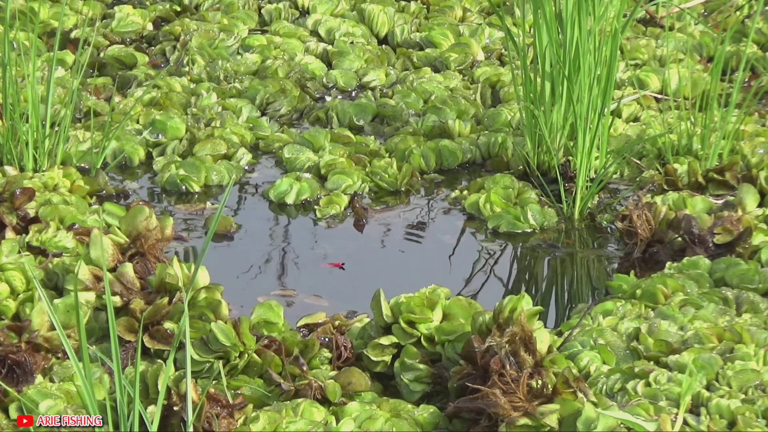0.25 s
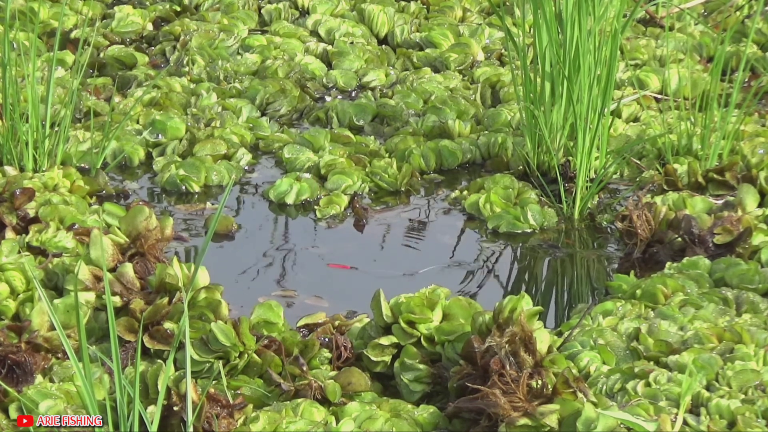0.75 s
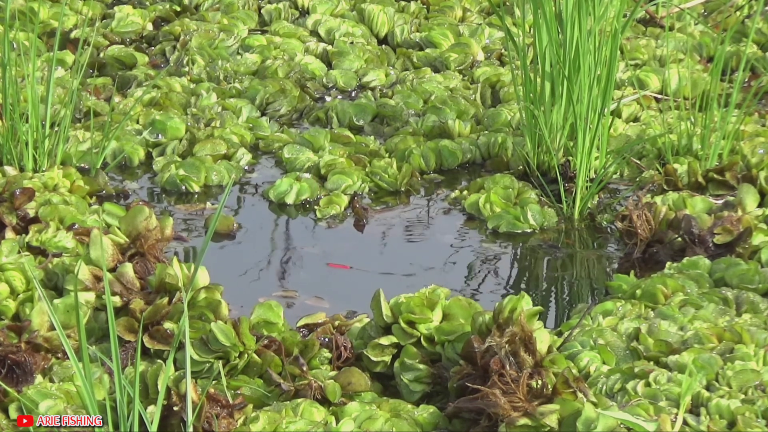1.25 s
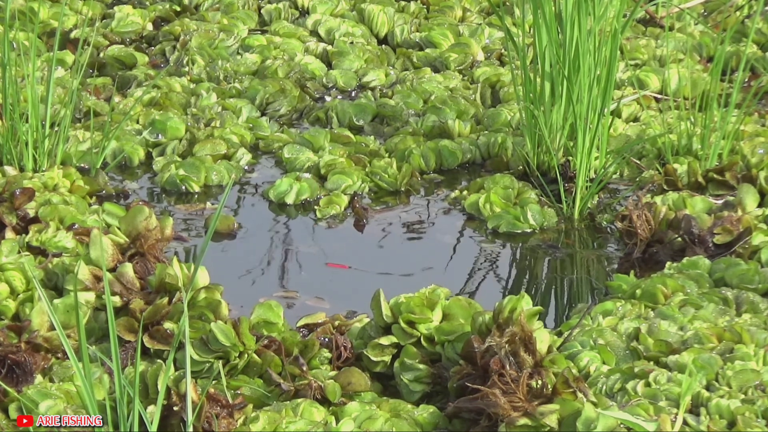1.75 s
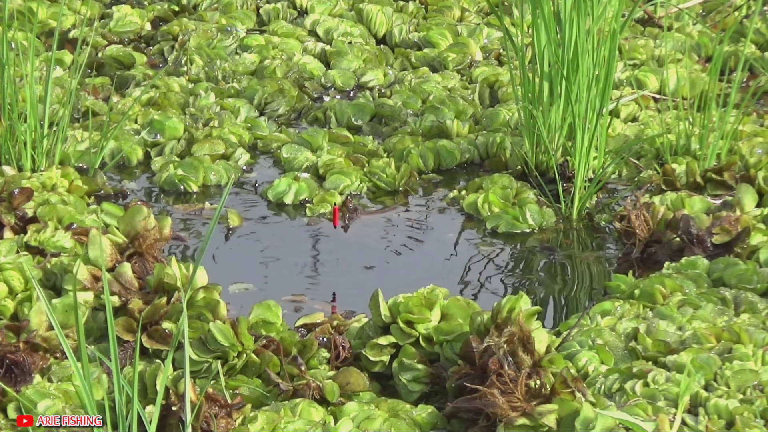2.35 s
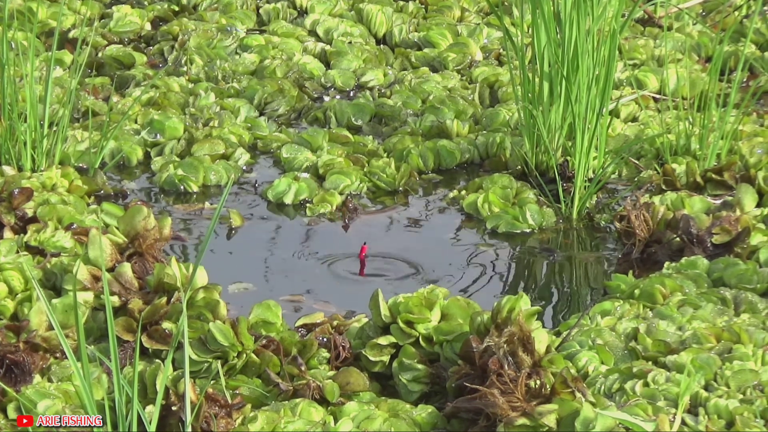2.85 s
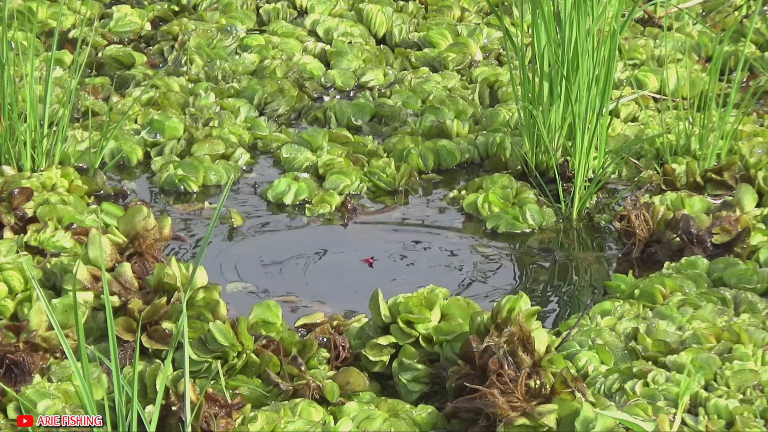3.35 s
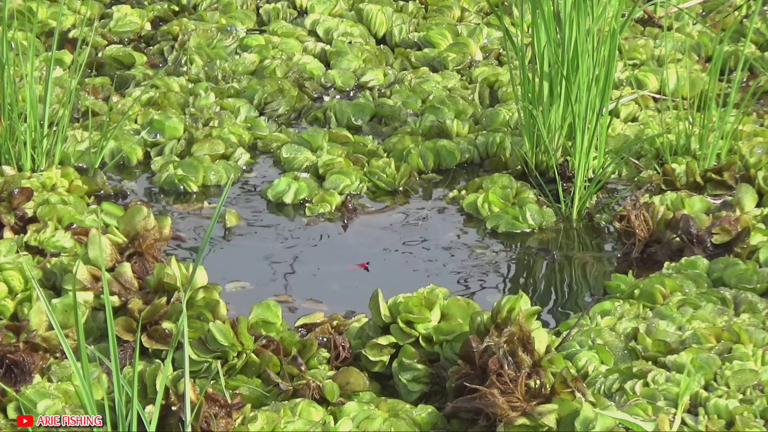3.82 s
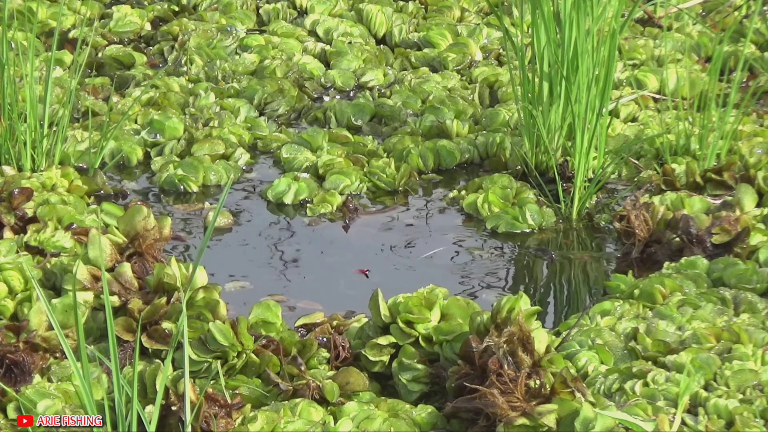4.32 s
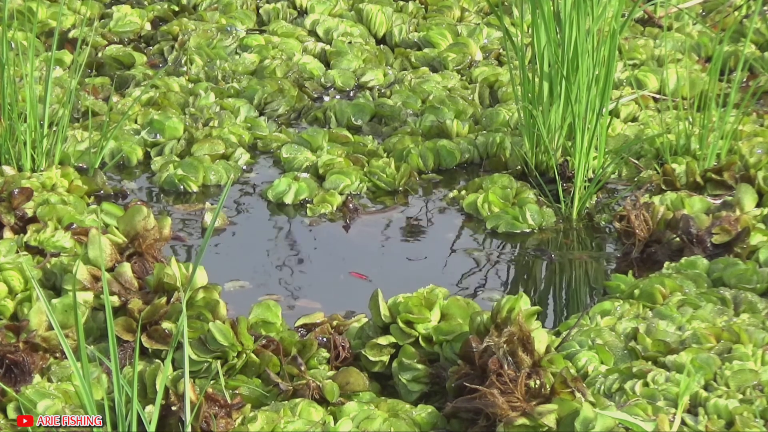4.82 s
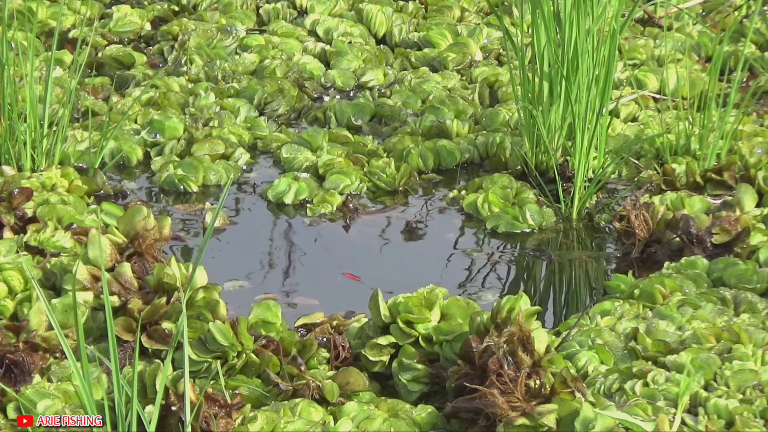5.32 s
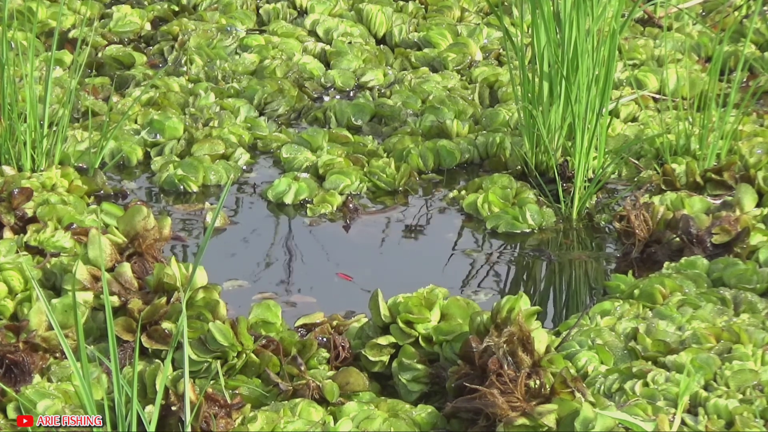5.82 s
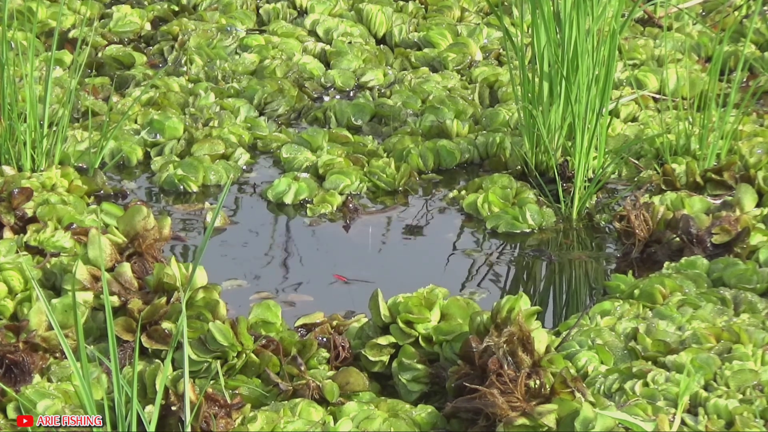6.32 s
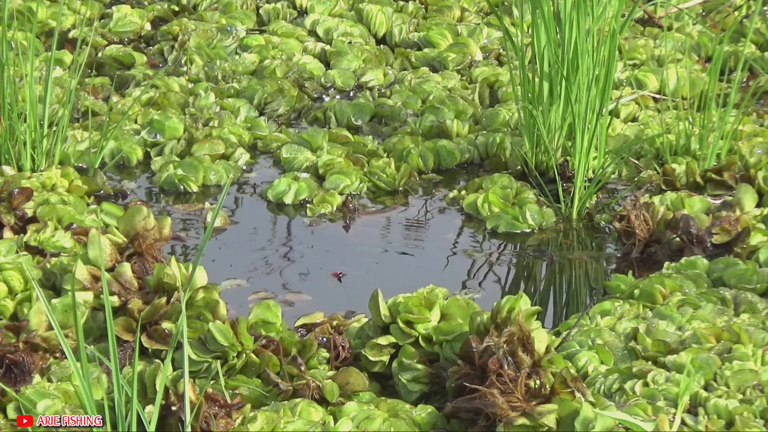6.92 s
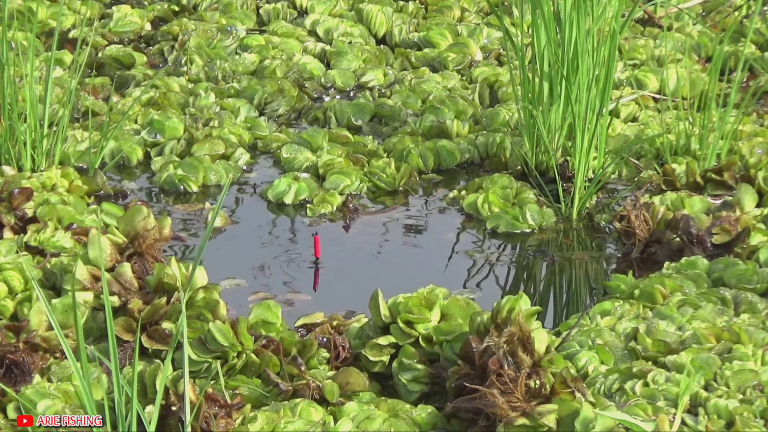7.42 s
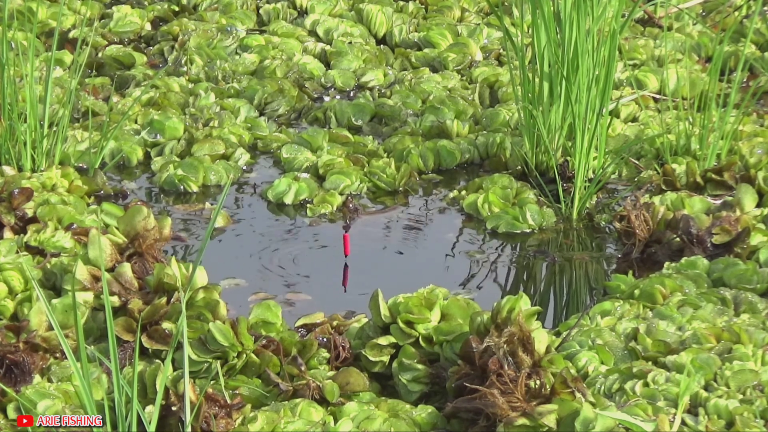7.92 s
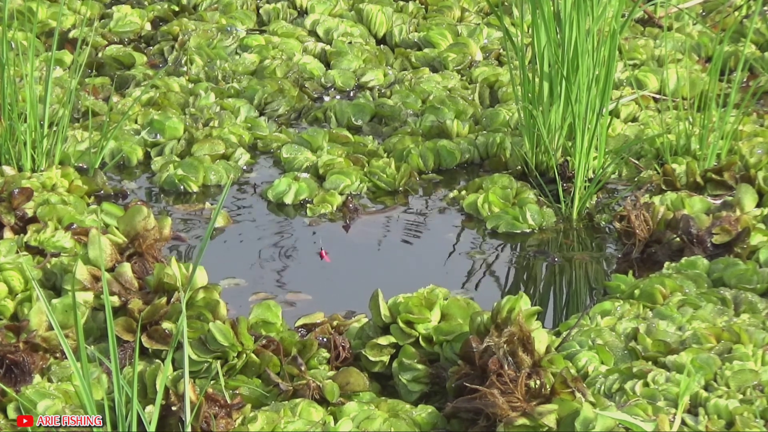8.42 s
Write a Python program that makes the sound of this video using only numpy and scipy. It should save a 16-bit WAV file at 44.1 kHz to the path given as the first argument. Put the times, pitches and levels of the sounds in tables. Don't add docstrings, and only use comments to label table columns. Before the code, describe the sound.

A dense insect chorus trills very high and continuously outdoors, with evenly repeated chirps, thin pure bird whistles and a faint marsh hush.

```python
import sys
import numpy as np
from scipy import signal
from scipy.fft import rfft, irfft, next_fast_len
from scipy.io import wavfile
from scipy.ndimage import uniform_filter1d, map_coordinates

SR = 44100
rng = np.random.default_rng(int(sys.argv[2]) if len(sys.argv) > 2 else 0)


def output_pcm(signal):
    pcm = np.clip(np.atleast_2d(signal).T, -1, 1) * 32767
    wavfile.write(sys.argv[1], SR, np.round(pcm).astype(np.int16))


def decibels_to_gain(level_db):
    exponent = np.asarray(level_db, float) / 20
    return 10 ** exponent


N = 382347

# last_stroke_s, peak_db
NEAR_CHIRPS = [(.04, -46.5), (.193, -47.5), (.441, -47.5), (.593, -49.5), (1.442, -49), (1.787, -49),
               (1.935, -48), (2.254, -49.5), (2.404, -48.5), (2.553, -52.5), (2.746, -51), (5.389, -49),
               (5.679, -49.5), (5.793, -48.5), (5.885, -56), (6.455, -57), (6.915, -55.5), (8.601, -48.5)]
# last_stroke_s, peak_db
BRIGHT_CHIRPS = [(.077, -59), (.226, -59.5), (1.781, -49), (2.03, -51.5), (2.867, -57.5), (3.64, -59),
                 (3.99, -55), (4.497, -52.7), (4.959, -51.5), (5.344, -51.5), (5.671, -51.5), (5.831, -62),
                 (6.337, -59.5), (6.548, -62), (7.408, -56.5), (7.644, -57.5), (7.834, -56), (8.605, -55.5)]


def unit(x):
    return x / np.sqrt(np.mean(x ** 2) + 1e-20)


def along(points, hz):
    point_hz, value = np.transpose(points)
    return np.interp(np.log(hz + 1), np.log(point_hz + 1), value)


def curves(rows):
    s, *columns = np.transpose(rows)
    t = np.arange(N) / SR
    return [np.interp(t, s, column) for column in columns]


def wobble(rate):
    knots = rng.standard_normal(int(N * rate / SR) + 4)
    return map_coordinates(knots, [np.arange(N) * rate / SR])


def rush(spectrum, alike):
    size = next_fast_len(N)
    hz = np.fft.rfftfreq(size, 1 / SR)
    likeness = np.clip(along(alike, hz), -.9, 1)
    z = rfft(rng.standard_normal((2, size))) * decibels_to_gain(along(spectrum, hz))
    side_gain = np.sqrt((1 - likeness) / (1 + likeness))
    mid, side = irfft(z * [np.ones(len(hz)), side_gain], size)[:, :N]
    return np.array([mid + side, mid - side]) / np.std(mid)


def add(out, s, sound, pan_db):
    part = out[:, round(s * SR):][:, :len(sound)]
    part += decibels_to_gain([[pan_db / 2], [-pan_db / 2]]) * sound[:part.shape[1]]


def tone(hz, db):
    return np.sqrt(2) * decibels_to_gain(db) * np.sin(2 * np.pi * np.cumsum(hz) / SR)


def sing(rows, level_db=0):
    s, hz, db = np.transpose(rows)
    t = np.arange(s[0], s[-1], 1 / SR)
    note = tone(np.interp(t, s, hz), np.interp(t, s, db) + level_db)
    return note * signal.windows.tukey(len(t), .06)


def knocks(rows, cycles, pan_db):
    out = np.zeros((2, N))
    for s, db, hz in rows:
        u = np.arange(-3 * cycles, 3 * cycles, hz / SR)
        blip = -decibels_to_gain(db) * np.exp(-(u / cycles) ** 2) * np.cos(2 * np.pi * u)
        add(out, s - 3 * cycles / hz, blip, pan_db)
    return out


def strokes(cycles, sharp):
    return np.exp(sharp * (np.cos(2 * np.pi * cycles) - 1))


def wing(hz, cycles, slide_hz, sharp, rough_hz, rough_db):
    pitch = hz - slide_hz * np.sin(2 * np.pi * cycles) + rough_hz * wobble(500)
    ring = np.sin(2 * np.pi * np.cumsum(pitch) / SR)
    return unit(ring * strokes(cycles, sharp) * decibels_to_gain(rough_db * wobble(600)))


def every_chirp(rows, number):
    s, db = np.transpose(rows)
    k = np.arange(number[-1] + 1)
    s, db = np.interp(k, number, s), np.interp(k, number, db)
    scatter_db = 1.0 * rng.standard_normal(len(s) + 1)
    return np.r_[s, s[-1] + .115], np.r_[db, db[-1]] + scatter_db


def swings(rows):
    db, = curves(rows)
    return db - db.mean()


def hush():
    # hz, density_db_per_hz
    colour = [(15, -44), (30, -16), (55, -7.5), (120, -6.5), (300, -1), (600, 0.87), (1100, -0.4),
              (1500, -2), (2500, -2.5), (3500, -4), (5000, -7.5), (7000, -5), (12000, -8), (15500, -12)]
    # time_s, level_db
    course = [(0.0, -61), (8.38, -62), (8.67, -62)]
    # hz, correlation_1
    likeness = [(60, 1), (110, 0.98), (200, 0.78), (380, .31), (700, -0.047), (1290, -0.14), (2380, 0.23),
                (4400, 0.54), (8120, 0.28), (10800, 0.93), (11100, 1)]
    level_db = curves(course)[0] + 6.5 + 0.16 * wobble(1.4)
    return decibels_to_gain(level_db) * rush(colour, likeness)


def puffs():
    # time_s, peak_db, pitch_hz
    gusts = [
        (7.025, -66, 55.1),
        (7.324, -52, 65),
        (7.49, -62, 60.2),
        (7.78, -66, 45.1),
        (7.96, -58, 55),
        (8.62, -71, 55),
    ]
    return knocks(gusts, cycles=0.35, pan_db=2.0)


def rustle():
    # start_s, length_s, level_db
    bursts = [
        (1.415, 0.028, -61),
    ]
    # hz, density_db_per_hz
    leaf_colour = [(2500, -40), (3500, -2), (6500, 0), (8000, -40)]
    t = np.arange(N) / SR
    swell = 0
    for s, length, db in bursts:
        half = length / 2
        swell = swell + decibels_to_gain(db) * np.exp(-((t - s - half) / half) ** 4)
    return swell * rush(leaf_colour, [(4000, .8)])


def choir(band, rate, sharp, alike):
    cycles = np.cumsum(rate + 3 * wobble(8.1)) / SR
    flutter = unit(strokes(cycles, sharp) * decibels_to_gain(0.52 * wobble(5.8)))
    return rush(band, [(9000, alike)]) * flutter


def chorus():
    # hz, density_db_per_hz
    low_band = [(6300, -37.5), (7000, -14), (7500, -5), (7850, 3.5), (8400, -1.5), (8800, -15), (9300, -39)]
    middle_band = [(8000, -42), (8500, -4), (8800, -7), (9050, -1), (9300, -6.5), (9600, -15), (10200, -48)]
    upper_band = [(8800, -35), (9200, 0), (9450, -1.5), (9950, -7.5), (10150, -10), (10400, -21),
                  (11000, -48)]
    thin_band = [(9800, -27), (10400, 0), (10800, 3), (11250, -0.5), (11500, -5), (12000, -35)]
    t = np.arange(N) / SR
    low = decibels_to_gain(-51 - 0.34 * t) * choir(low_band, rate=78, sharp=0.12, alike=0.8)
    middle_db = -51.5 + 0.48 * swings(NEAR_CHIRPS)
    middle = decibels_to_gain(middle_db) * choir(middle_band, rate=160, sharp=0.11, alike=0.59)
    upper_db = -55 + 0.57 * swings(BRIGHT_CHIRPS)
    upper = decibels_to_gain(upper_db) * choir(upper_band, rate=133, sharp=0.44, alike=.7)
    thin = decibels_to_gain(-65.5) * rush(thin_band, [(9000, 1.0)]) * unit(strokes(126 * t, sharp=0.43))
    return low + middle + upper + thin


def level_whistles(out):
    # start_s, length_s, pitch_hz, peak_db
    level_notes = [(0.022, 0.059, 3000, -63), (.1, .05, 3020, -66), (0.592, 0.076, 1890, -66.5),
                   (.24, 0.05, 2570, -57), (1.745, .055, 3000, -67), (1.81, 0.216, 2990, -64),
                   (3.44, 0.42, 3052, -64), (3.65, .15, 2186, -71), (4.97, 0.11, 3035, -67.5),
                   (5.52, .11, 3005, -71), (5.645, 0.066, 2160, -66), (7.015, .165, 2810, -67.5),
                   (7.46, .24, 3026, -69), (8.52, 0.12, 2770, -62)]
    for start, length, hz, level_db in level_notes:
        rows = [(0, hz * (1 + 0.0123), -2.5), (0.8 * length, hz, 0), (length, hz, -1.5)]
        add(out, start, sing(rows, level_db), pan_db=5.0)


def arches_and_hooks(out):
    # start_s, length_s, top_hz, level_db
    arches = [
        (2.497, 0.11, 3385, -64),
        (4.401, 0.12, 3380, -59),
        (5.485, 0.12, 3340, -61),
        (8.305, .1, 3440, -67),
        (5.17, .035, 5200, -65),
    ]
    # start_s, length_s, top_hz, peak_db
    hooks = [(.142, 0.046, 3700, -61), (.308, .035, 3460, -65), (.215, .03, 2300, -65),
             (1.1, .045, 4150, -65), (1.21, .022, 4150, -63), (1.238, .045, 4100, -60),
             (1.385, .055, 4180, -62), (1.535, 0.056, 3950, -64), (2.125, .055, 3980, -65)]
    # share_of_length, share_of_top_pitch, level_db
    arch_shape = [(0, .97, -6), (.2, .992, -1.5), (.45, 1, 0), (.8, .99, -1), (1, .965, -6)]
    hook_shape = [(0, .87, -7), (.25, 0.97, -0.5), (.5, .92, -0.5), (1, .74, -0.5)]
    for table, shape, pan_db in ((arches, arch_shape, 1.2), (hooks, hook_shape, 3)):
        for start, length, hz, level_db in table:
            add(out, start, sing(np.multiply(shape, [length, hz, 1]), level_db), pan_db)


def slides_and_pips(out):
    # start_s, length_s, start_hz, end_hz, peak_db
    slides = [
        (5.36, 0.031, 3200, 3980, -64),
        (.375, .04, 2580, 2450, -62),
        (5.205, .045, 5150, 4400, -66),
    ]
    # start_s, middle_hz, peak_db
    pips = [(.842, 2890, -57), (.939, 2840, -54), (1.037, 2820, -51), (1.125, 2810, -51),
            (1.216, 2740, -51), (1.308, 2710, -52), (1.483, 2400, -55), (1.578, 2690, -55),
            (1.582, 2200, -59), (1.664, 2630, -54), (1.754, 2590, -55), (1.836, 2400, -54),
            (1.968, 2730, -54), (.494, 2480, -65), (5.343, 3010, -59)]
    glides = list(slides)
    for s, hz, db in pips:
        glides.append((s, .016, 1.03 * hz, .94 * hz, db))
    for start, length, start_hz, end_hz, db in glides:
        u = np.arange(0, length, 1 / SR) / length
        glide = tone(start_hz + (end_hz - start_hz) * u ** 1.5, db - 1.2)
        add(out, start, glide * np.sin(np.pi * u) ** .3, pan_db=3)


def scooped_notes(out):
    # start_s, level_db
    scoops = [
        (.38, -59),
        (1.027, -57.5),
        (1.653, -54.5),
        (6.857, -64.5),
        (7.498, -70),
    ]
    # time_s, pitch_hz, level_db
    scoop_shape = [(0, 2396, 0), (.006, 2210, 1.5), (.016, 1913, -1), (.027, 1722, -4.5), (.04, 1933, -2),
                   (.053, 2300, 1), (.064, 2390, 6.5), (.072, 2390, -20)]
    for start, level_db in scoops:
        add(out, start, sing(scoop_shape, level_db), pan_db=6.0)


def long_whistles(out):
    # start_s, length_s, peak_db
    whistles = [(.009, .195, -49.5), (.643, .195, -50), (1.288, .185, -48), (1.915, .115, -51),
                (4.03, .16, -65), (4.66, .15, -64.5), (5.212, .21, -61.5), (5.851, .19, -59),
                (6.483, .185, -57), (7.122, .185, -56), (7.765, .185, -58.5), (8.45, .215, -63)]
    # share_of_length, pitch_hz, level_db
    whistle_shape = [(0, 2727, -14), (.03, 2670, -4), (.07, 2590, -5), (.5, 2533, -4), (.92, 2518, 0),
                     (1, 2570, -17)]
    for start, length, level_db in whistles:
        note = sing(np.multiply(whistle_shape, [length, 1, 1]), level_db)
        add(out, start, note, pan_db=7.5)
        add(out, start + .075, decibels_to_gain(-12.5) * note, pan_db=5.0)


def birds():
    out = np.zeros((2, N))
    level_whistles(out)
    arches_and_hooks(out)
    slides_and_pips(out)
    scooped_notes(out)
    long_whistles(out)
    return out * decibels_to_gain(1.0 * wobble(45))


def ticks():
    # time_s, peak_db, pitch_hz
    snaps = [(1.4185, -46, 5320), (1.428, -47, 6560), (1.431, -44, 4330), (1.977, -39, 2900),
             (2.7992, -38.5, 2780), (3.4186, -37, 2610), (3.422, -42, 2500), (5.5635, -46, 5300),
             (5.567, -46, 5500), (5.571, -49, 5300), (6.9985, -40, 2850), (8.032, -45, 6260)]
    return knocks(snaps, cycles=1.35, pan_db=1.1)


def low_singer():
    # peak_s, peak_db
    throbs = [(.035, -51.5), (1.313, -50), (1.536, -54), (1.672, -52.5), (2.343, -49), (2.706, -53),
              (4.073, -49.5), (4.161, -52.5), (4.642, -54.7), (4.764, -48.7), (5.797, -54), (6.382, -56),
              (8.436, -49.4), (8.547, -52)]
    throb_count = [0, 11, 13, 14, 20, 23, 35, 36, 39, 40, 49, 53, 71, 72]
    t = np.arange(N) / SR
    peak, db = every_chirp(throbs, throb_count)
    k = np.searchsorted((peak[1:] + peak[:-1]) / 2, t)
    lag = t - peak[k]
    throb = np.exp(-(lag / np.where(lag < 0, .026, .019)) ** 2)
    cycles = np.cumsum(142 + 8 * wobble(3.7)) / SR
    ring = wing(7900, cycles, slide_hz=90, sharp=0.5, rough_hz=95, rough_db=2.2)
    return decibels_to_gain(db[k] + 0.1) * throb * ring * decibels_to_gain([[-.3], [.3]])


def chirps(last, db, rate, **mode):
    t = np.arange(N) / SR
    stop = last + .007
    k = np.minimum(np.searchsorted(stop, t), len(stop) - 1)
    since = t - np.r_[stop[0] - .12, stop][k]
    swell = np.clip((since - .016) / 0.032, 0, 1) * decibels_to_gain(-30 * np.abs(stop[k] - .035 - t))
    envelope = uniform_filter1d(swell * decibels_to_gain(db[k]), size=250)
    return envelope * wing(cycles=(t - last[k]) * rate[k], **mode)


def near_singer():
    near_count = [0, 1, 3, 4, 11, 14, 15, 18, 19, 20, 22, 43, 45, 46, 47, 52, 57, 71]
    bright_count = [0, 1, 14, 16, 23, 29, 32, 36, 40, 43, 45, 46, 50, 51, 59, 60, 62, 67]
    # time_s, rate_hz
    stroke_rate = [(0, 135), (1.8, 130.5), (2.45, 130), (2.75, 140), (3.3, 135), (5.8, 132.5), (7.1, 130),
                   (8.6, 131)]
    last, db = every_chirp(NEAR_CHIRPS, near_count)
    rate = np.interp(last, *np.transpose(stroke_rate))
    lower = chirps(last, db, rate, hz=9020, slide_hz=150, sharp=1.4, rough_hz=105, rough_db=1.2)
    last, db = every_chirp(BRIGHT_CHIRPS, bright_count)
    rate = np.full(len(db), 132)
    upper = chirps(last, db + 3, rate, hz=9500, slide_hz=380, sharp=1.9, rough_hz=140, rough_db=1.4)
    return decibels_to_gain(2.0) * lower * decibels_to_gain([[.4], [-.4]]) + upper * decibels_to_gain([[.6], [-.6]])


def echoes(x):
    # delay_s, left_db, right_db
    paths = [
        (.011, -14, -10.5),
        (0.02, -13, -33),
        (0.035, -23, -21),
        (.064, -15, -18),
    ]
    out = np.zeros((2, N))
    for s, left_db, right_db in paths:
        late = np.pad(x, ((0, 0), (round(s * SR), 0)))[:, :N]
        out += decibels_to_gain([[left_db], [right_db]]) * late
    return out


def scene():
    background = hush() + puffs() + rustle() + chorus()
    calls = birds() + ticks()
    singers = low_singer() + near_singer()
    wet = echoes(decibels_to_gain(-2.0) * calls + decibels_to_gain(-4.0) * singers)
    return background + calls + singers + wet


def band_limit(x):
    return signal.sosfilt(signal.butter(12, 16490, fs=SR, output="sos"), x)


def record(dry):
    passed = np.fft.rfftfreq(N, 1 / SR) < 15480
    kept = irfft(rfft(dry) * passed, N)
    return band_limit(kept)


dry = scene()
out = record(dry)
output_pcm(out)
```